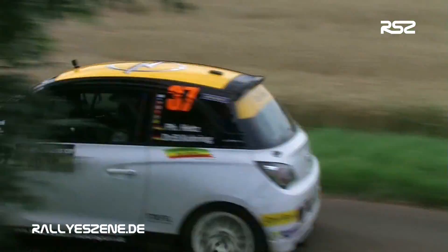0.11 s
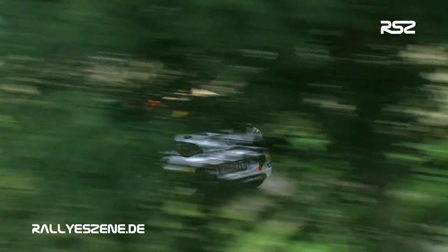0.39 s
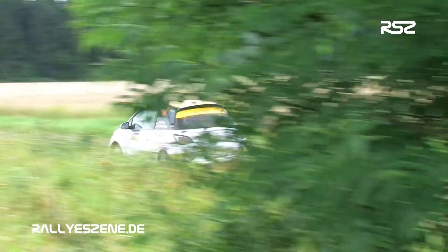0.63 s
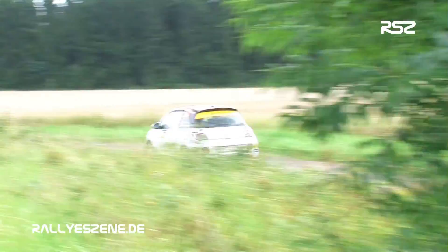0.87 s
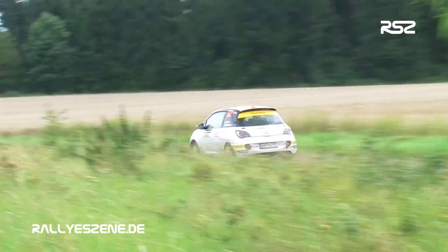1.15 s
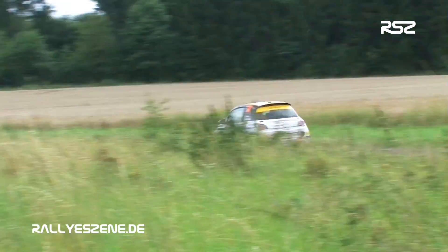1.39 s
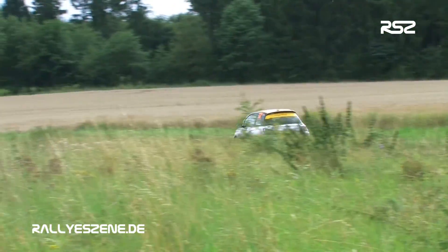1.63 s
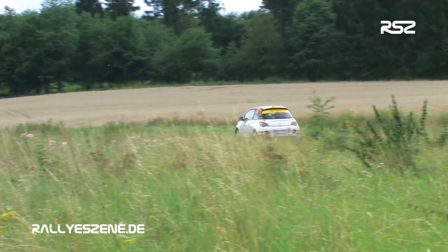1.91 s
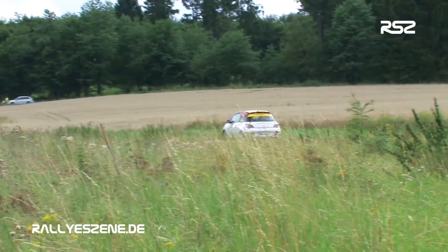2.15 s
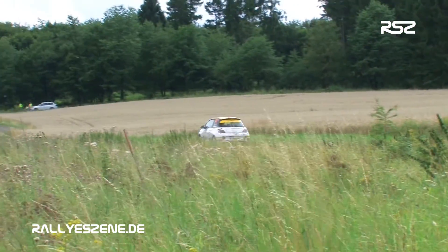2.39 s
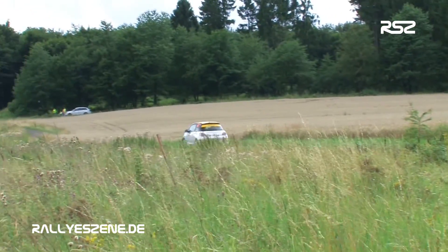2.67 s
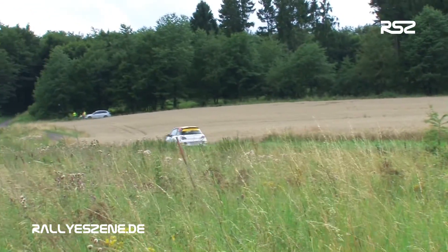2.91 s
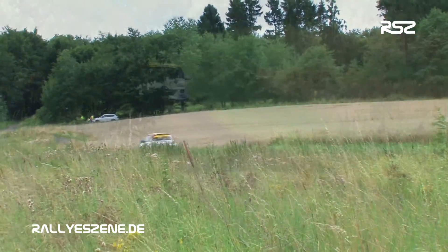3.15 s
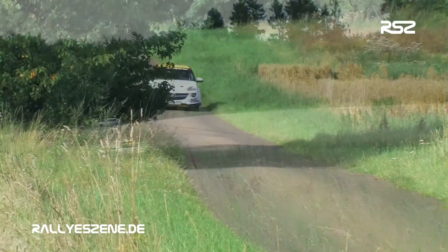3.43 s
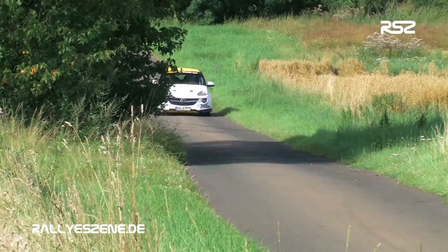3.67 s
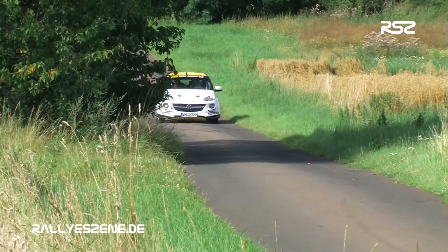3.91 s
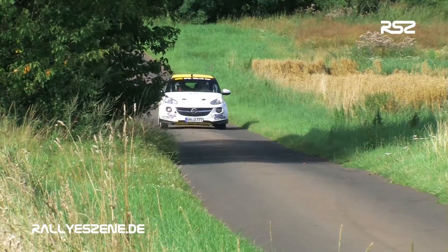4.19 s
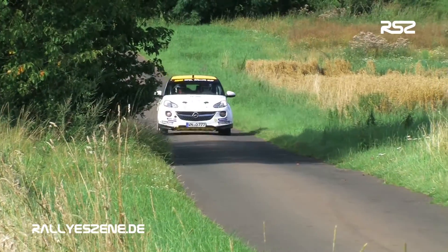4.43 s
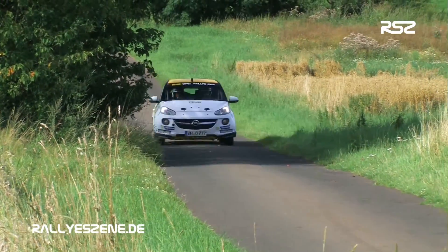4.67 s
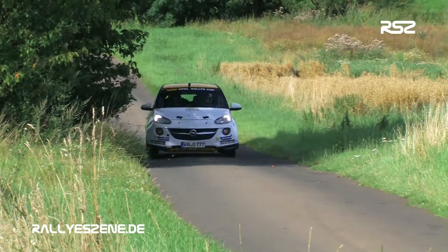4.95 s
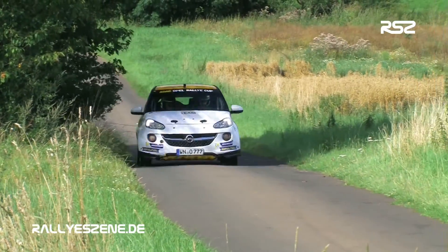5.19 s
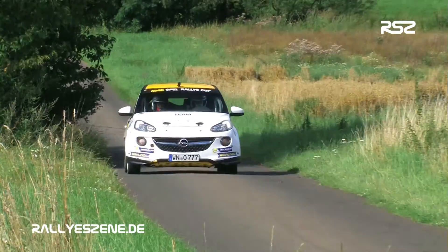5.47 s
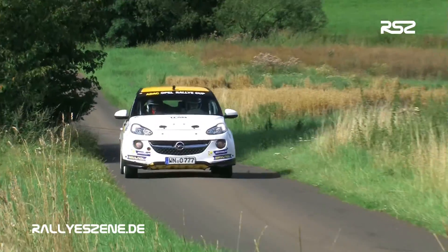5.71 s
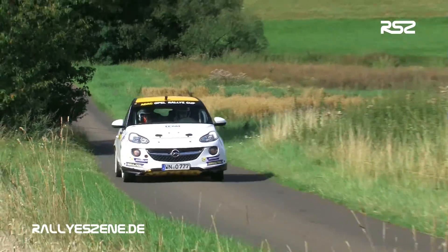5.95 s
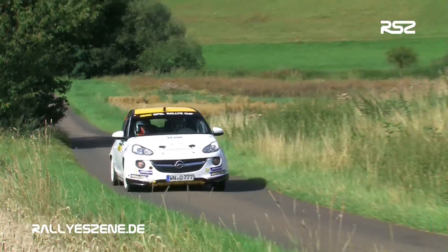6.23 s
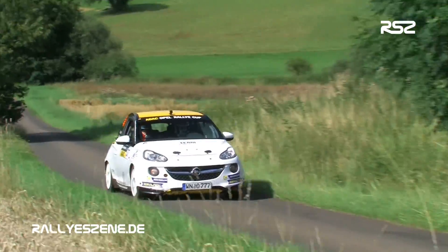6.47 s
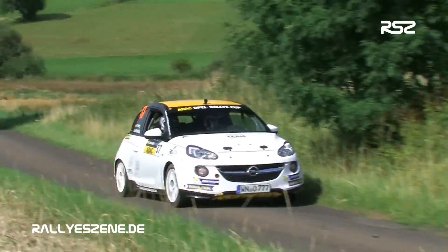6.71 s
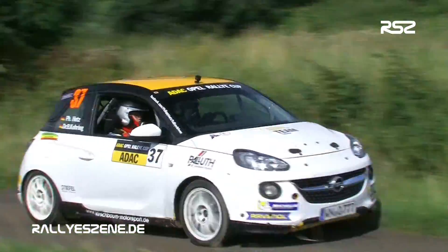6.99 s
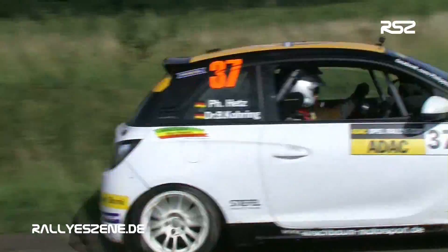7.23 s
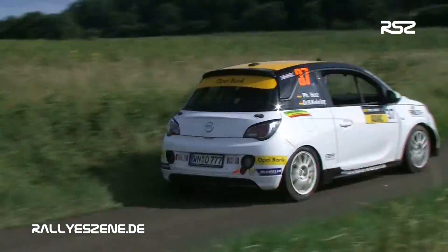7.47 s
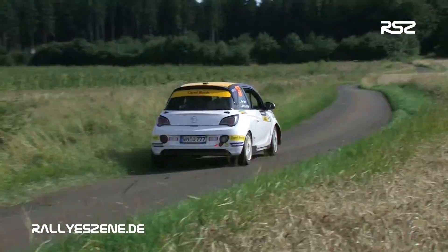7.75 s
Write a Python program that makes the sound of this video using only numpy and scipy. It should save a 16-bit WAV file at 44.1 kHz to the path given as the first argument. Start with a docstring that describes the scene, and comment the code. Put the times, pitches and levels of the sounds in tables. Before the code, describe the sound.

A small rally car has just passed close by and howls away over a field, its raspy exhaust holding high revs with quick gear-change dips and gritty cracks. The sound fades across to a similar car far down a country road, which swells with gear whine and tyre roar, bursts past and drops in pitch. Outdoors, near-mono close stereo microphones, with faint grasshopper and quiet air.

```python
"""A four-cylinder rally car howls away across a field at high revs; the sound then fades over to
the same kind of car coming head-on down a country road, sweeping past and dropping in pitch.
Crank orders are wavering sines bent by Doppler; tyre and intake roar is shaped noise, and a gear whine
sings at the tooth rates. Trees return the firing tone; short noise bursts crack and scuff.
Behind lie a low ground rumble, quiet air and a faint grasshopper, all heard on two close microphone ports."""
import sys
import numpy as np
from scipy import signal
from scipy.fft import rfft, irfft, next_fast_len
from scipy.io import wavfile
from scipy.ndimage import uniform_filter1d

SR = 44100
rng = np.random.default_rng(int(sys.argv[2]) if len(sys.argv) > 2 else 0)


def store_pcm(level_fs):
    """Save levels as 16-bit WAV."""
    pcm = np.round(np.clip(level_fs, -1, 1) * 32767).astype(np.int16)
    wavfile.write(sys.argv[1], SR, np.atleast_2d(pcm).T)


def voltage_ratio(level):
    """Linear amplitude factor for a level in decibels (scalar or array-like)."""
    return 10 ** (np.asarray(level, float) / 20)


N = 346626
T = np.arange(N) / SR  # time of every sample [s]

SPEED_M_S, PASS_M, SOUND_M_S = 32, 6.4, 343  # road speed, closest distance to the microphone, speed of sound
TYRE_LEAD_S, GEARBOX_LEAD_S = 0.24, 0.047  # tyres with intake, and gearbox, pass this long before the tailpipe
# each car: (tailpipe abreast [s], firing tone cancels [s], strength of the pipe's upper orders [dB])
FIRST, SECOND = (.1, -0.062, 1.5), (7.37, 7.04, -1.5)
FACING_S, FACING_FOR_S = 6.04, 0.42  # the grille points straight at the microphone


def evened(x):
    """Scales to rms 1."""
    return x / np.sqrt(np.mean(x ** 2) + 1e-20)


def read(points, hz):
    """Value of a spectrum table on a log-frequency axis."""
    f, value = np.transpose(points)
    return np.interp(np.log(hz + 1), np.log(f + 1), value)


def columns(rows, t):
    """Every column of a curve table at the times t."""
    s, *rest = np.transpose(rows)
    return [np.interp(t, s, c) for c in rest]


def rfftfreq_hz(size):
    """Bin frequencies of a real transform."""
    return np.fft.rfftfreq(size, 1 / SR)


def drift(hz):
    """Smooth random wander of rms 1, changing about hz times a second."""
    size = max(round(SR / hz / 2), 1)
    once = uniform_filter1d(rng.standard_normal(N), size)
    return evened(uniform_filter1d(once, size))


def band(x, hz, width):
    """Band-pass around hz."""
    edges = np.clip([hz - width / 2, hz + width / 2], 20, .49 * SR)
    return signal.sosfilt(signal.butter(2, edges, "band", fs=SR, output="sos"), x)


def bump(t, s, length):
    """Bell of height 1."""
    return np.exp(-((t - s) / length) ** 2)


def faded_over(t):
    """0 while the car in the field is heard, 1 for the car on the road."""
    return np.interp(t, (3.054, 3.71), [0, 1])


def tail_shown(t):
    """Share of the tailpipe side in what is heard: the first car, then the second's nose, then its tail."""
    return np.where(faded_over(t) < .5, 1, .5 + .5 * np.tanh((t - 7.2) / .1))


def second_tail(t):
    """Tailpipe share of the second car alone, all nose until it is nearly abreast."""
    return np.where(t < 6.2, 0, tail_shown(t))


def along(t, abreast_s):
    """Metres past the closest point, and distance from the microphone."""
    past = SPEED_M_S * (t - abreast_s)
    return past, np.hypot(past, PASS_M)


# the climb up the winding road toward the microphone:
# (time [s], nearness [dB], firing tone [dB], its octave [dB])
APPROACH = [(3.6, -33.5, -50, -59.5), (4.13, -31.5, -44.5, -64), (4.9, -26.5, -39, -59),
            (5.5, -24.5, -31, -57), (5.9, -17, -31.5, -47), (6.15, -10.5, -25.5, -46),
            (6.45, -8, -17.5, -42), (6.75, -7, -17, -26.5), (7.0, -1, -15.5, -28), (7.2, 3.5, -12, -23)]
# how each layer follows nearness, before its own trims; treble and rumble are against the roar:
# (tail side when closest [dB], share, nose side when closest [dB], share, gain when facing [dB])
FOLLOW = dict(rasp=(-23.5, 1.03, -33, .75, .1), roar=(-27, .65, -18.5, 1.01, .1),
          treble=(-7, .1, -5, .1, 7), rumble=(0, .55, -8, -.2, -2), whine=(-61, .5, -36, 1.35, 14))


def levels(t, car, tail):
    """Every layer's dB: spreading with distance from the tail side, the approach from the nose side."""
    abreast_s, cancel_s, upper_db = car
    nose = 1 - tail
    away_db, ahead_db = [20 * np.log10(PASS_M / along(t + lead, abreast_s)[1]) for lead in (0, TYRE_LEAD_S)]
    near_db, firing_db, octave_db = columns(APPROACH, t)
    facing = bump(t, FACING_S, FACING_FOR_S)
    out = {}
    for name, (tail_db, share, nose_db, nose_share, facing_db) in FOLLOW.items():
        tail_side = tail_db + share * (ahead_db if name == "roar" else away_db)
        if name == "rasp":
            tail_side = tail_side + upper_db
        nose_side = nose_db + nose_share * near_db + facing_db * facing
        out[name] = tail * tail_side + nose * nose_side
    # tyres hiss brighter while the flank is in view
    for name, db in (("roar", 4.5), ("treble", 3)):
        out[name] = out[name] + tail * db * bump(t, abreast_s - TYRE_LEAD_S, 0.45)
    # nose and tailpipe meet in opposite phase for a moment
    cancel_db = -12.5 * bump(t, cancel_s, 0.065)
    out["firing"] = tail * (-12 + 0.36 * away_db) + nose * firing_db + cancel_db
    out["octave"] = tail * (-17.5 + 1.15 * away_db + upper_db) + nose * octave_db + 0.73 * cancel_db
    out["thump"] = tail * (-32.5 + 0.37 * away_db) + nose * (-18 + 0.52 * firing_db)
    return out


def meadow():
    """A grasshopper's rasp, each beat dying away at once, over quiet air that differs at the two ports."""
    beat = T * 19.3 % 1  # beats per second
    rasp = evened(band(rng.standard_normal(N), 7100, 1100)) * np.exp(-beat / .12)
    air = evened(band(rng.standard_normal((2, N)), 10000, 6000))
    return voltage_ratio(-63) * rasp + voltage_ratio(-80) * air


def ground_rumble():
    """Low lumpy rumble, band-passed noise: weak in the field, growing as the second car nears."""
    over = faded_over(T)
    level_db = -46 - 12.5 * (1 - over) + 0.22 * over * columns(APPROACH, T)[0]
    low_noise = evened(band(rng.standard_normal(N), 65, 45))
    return voltage_ratio(level_db + 4.0 * drift(5)) * low_noise


# firing tone thrown back by trees behind the nearing car, lowered by its motion:
# (time [s], pitch [Hz], level [dB])
ECHO = [(5.36, 198, -34), (5.64, 198, -30), (5.82, 190.1, -33), (6.9, 196, -32)]


def echo():
    """A fuzzy gliding tone with a weak octave, from many trunks at once."""
    hz, db = columns(ECHO, T)
    angle = 2 * np.pi * np.cumsum(hz + 3.06 * drift(6.9)) / SR
    heard = np.clip(np.minimum(T - ECHO[0][0], ECHO[-1][0] - T) / 0.06, 0, 1)
    tones = np.cos(angle) + voltage_ratio(-20) * np.cos(2 * angle)
    return np.sqrt(2) * heard * voltage_ratio(db + 2.5 * drift(20)) * tones


# exhaust cracks, tyre scuffs, gravel spits and two brief drones near 1 kHz:
# (time [s], level before halving [dB], length [s], centre [Hz], width [Hz])
CRACKS = [(0.394, -47, 0.0095, 8960, 6900), (.05, -15, 0.072, 930, 400), (0, -33, .12, 5500, 4000),
          (0.961, -28.5, 0.24, 1180, 300), (0.966, -29.5, 0.031, 3880, 700), (1.102, -27, 0.02, 3800, 1200),
          (1.129, -31.5, 0.082, 3820, 1300), (1.557, -31, 0.046, 1150, 350), (1.562, -29, 0.05, 2100, 495),
          (1.682, -36, 0.05, 3800, 1800), (1.75, -34.5, 0.054, 3830, 1480), (3.847, -50, .003, 8850, 6000),
          (3.98, -46, .25, 1050, 130), (4.7, -45, .12, 1030, 80), (4.615, -46, .003, 9600, 3000),
          (7.646, -27, 0.011, 3020, 2500), (7.696, -26.5, 0.029, 7760, 3470),
          (7.702, -18.5, 0.031, 3840, 1500), (7.695, -16, 0.025, 1850, 1620)]


def cracks():
    """Short gritty bursts with a fast start: spiky noise, band-passed twice, under a falling bell."""
    out = np.zeros(N)
    for s, db, length, hz, width in CRACKS:
        u = np.arange(round(3 * length * SR)) / (length * SR)
        grit = rng.standard_normal(len(u)) ** 2 * rng.standard_normal(len(u))
        noise = band(band(grit, hz, width), hz, 2 * width)
        burst = evened(noise) * np.minimum(u / 0.13, 1) * np.exp(-u ** 2)
        part = out[round(s * SR):][:len(u)]
        part += voltage_ratio(db) / 2 * burst[:len(part)]
    return out


# relative spectrum of tyre and intake roar: (frequency [Hz], level per Hz [dB])
ROAR_COLOUR = [(90, -3), (190, 6), (620, -2), (950, 2), (1350, -2), (2100, 0), (2950, -9), (4000, -4.5),
               (5700, -22), (6900, -16), (8100, -23), (9000, -20), (11400, -34), (12100, -47), (12700, -36),
               (14000, -36.5)]
# likeness of the roar at the two ports: (frequency [Hz], left-right likeness [0..1])
LIKENESS = [(300, .99), (3000, .98), (7000, .998), (13000, .93)]
# intake colouring heard from the nose, two dips and one peak: (centre [Hz], width [Hz], level change [dB])
INTAKE = [(1070, 36, -3), (1300, 950, -4), (1634, 260, 5)]
# rougher stretches under the tyres: (time [s], length [s], level [dB])
SURGES = [(0.047, 0.044, 3), (1.605, 0.062, 5), (3.1, 0.072, 4)]


def roar(turns):
    """Tyre and intake roar: patchy noise, two nearly alike channels, puffing a little with each firing."""
    frames, hz = N // 128 + 5, rfftfreq_hz(512)
    t = np.arange(frames) * 128 / SR
    over = faded_over(t)
    first = levels(t, FIRST, 0.98)
    second = levels(t, SECOND, second_tail(t))
    first_gain = (1 - over) ** 1.05 * voltage_ratio(first["roar"])
    second_gain = np.sqrt(over) * voltage_ratio(second["roar"])
    level_db = 20 * np.log10(np.hypot(first_gain, second_gain))
    treble_db, rumble_db = [(1 - over) * first[name] + over * second[name] for name in ("treble", "rumble")]
    surge_db = sum(db * bump(t, s, length) for s, length, db in SURGES)

    a, b, c, d, patches = rng.standard_normal((frames, len(hz), 5)).T
    patches = evened(uniform_filter1d(uniform_filter1d(patches, size=8, axis=0), size=18, axis=1))
    gusts = evened(uniform_filter1d(rng.standard_normal(frames), size=14))
    colour = voltage_ratio(read(ROAR_COLOUR, hz))
    colour /= np.sqrt(np.mean(colour ** 2 * (hz > 1100) * (hz < 3000)))
    # distance eats more of the top octaves
    high = np.interp(np.log(hz + 1), np.log([2500, 4000, 11000]), [0, 1, 1.45])[:, None]
    low = np.interp(np.log(hz + 1), np.log([350, 900]), [1, 0])[:, None]
    intake_db = sum(db / (1 + (2 * (hz - f) / width) ** 2) for f, width, db in INTAKE)[:, None]
    intake_db = intake_db * (1 - tail_shown(t))

    same, left = read(LIKENESS, hz)[:, None], a + 1j * b
    right = same * left + np.sqrt(1 - same ** 2) * (c + 1j * d)
    z = np.array([left, right]) / signal.istft(left, nperseg=512, noverlap=384)[1].std()
    shape_db = level_db + high * (treble_db + 3.5) + low * (rumble_db - 0.5) + intake_db
    rough_db = 0.91 * patches + (0.42 * gusts + surge_db) * (hz[:, None] > 900)
    z *= colour[:, None] * voltage_ratio(shape_db + rough_db)
    puffs = 1 + .22 * np.cos(4 * np.pi * turns) + .13 * np.cos(2 * np.pi * turns)
    return signal.istft(z, nperseg=512, noverlap=384)[1][:, :N] * puffs


def tone(order, turns, db):
    """A sine at a multiple of the shaft's turning, from a random phase."""
    return np.sqrt(2) * voltage_ratio(db) * np.cos(2 * np.pi * (order * turns + rng.random()))


def locked(order, turns, db, lag=0):
    """A crank order in sine phase, less its lag in turns: unlagged pulses rise fast and fall slowly."""
    return np.sqrt(2) * voltage_ratio(db) * np.sin(2 * np.pi * (order * turns - lag))


# the gearbox side turns toward the listener: (time [s], length [s], level [dB])
WHINE_SWELLS = [(.04, .17, 13), (2.45, .2, 5)]


def whine(nose_turns, car, tail, close, wavers):
    """Gear whine: two sines at 40 and 60 teeth per crank turn, from the gearbox in the nose."""
    turns = nose_turns + np.cumsum(.13 * drift(14)) / SR  # 0.13 Hz of wobble
    db = levels(T, car, tail ** 4)["whine"] + 1.5 * drift(4) - 9 * np.sqrt(tail) * (1 - tail)
    db = db + sum(swell_db * bump(T, s, length) for s, length, swell_db in WHINE_SWELLS)
    lower = tone(40, turns, db + 3 - 6 * tail - 13 * close + 2.5 * wavers[5])
    return lower + tone(60, turns, db + 3.5 * wavers[3])


# gear changes: (time [s], drop of revs [Hz], recovery [s])
SHIFTS = [(0.478, 5, 0.04054), (1.579, 4.3, .3), (7.68, 4.7, 0.064)]


def crank_turns(revs, abreast_s, tail):
    """Crank angle in turns as heard from tailpipe and gearbox: revs with shift dips, bent by Doppler."""
    hz = columns(revs, T)[0]
    fall_s = 0.0406
    for s, drop_hz, back_s in SHIFTS:
        fall = np.clip((T - s) / fall_s, 0, 1)
        hz = hz - drop_hz * fall * np.exp(-np.maximum(T - s - fall_s, 0) / back_s)
    hz = hz * (1 + (0.00073 + 0.00069 * tail) * drift(30.2))
    heard = []
    for lead in (0, GEARBOX_LEAD_S):
        past, distance = along(T + lead, abreast_s)
        heard.append(np.cumsum(hz * (1 - past / distance * SPEED_M_S / SOUND_M_S)) / SR)
    return heard


# weaker crank orders against the rasp: (order [per crank turn], level from the tailpipe side [dB],
# level from the nose [dB], gain of the nose close up [dB])
ORDERS = [(1.5, -14.5, 3, -2), (2.5, -16, -4.5, 4), (3, -6, 0, -1.5), (5, -4.5, -20.5, 17),
          (6, -3.5, 2.5, 0), (6.5, -24.5, -12.5, -1), (7, -14, -10.5, 0), (8, -5.5, -9, 5),
          (9, -3, -4.5, 9.5), (10, -5.5, -10, 14.5), (11, -14, -12.5, 9), (12, -18.5, -16, 14.5),
          (15, -20.5, -4, 9.5), (16, -24, -6, 11), (20, -28, -13, 10)]


def engine(revs, car, tail):
    """Crank orders as wavering sines, with gear whine; returns the sound and the crank angle in turns."""
    turns, nose_turns = crank_turns(revs, car[0], tail)
    level = levels(T, car, tail)
    nose = 1 - tail
    wavers = [drift(26) for _ in range(7)]  # the air and uneven burning make the orders flutter
    firing_flutter_db = 0.61 + 1.8 * nose * (T < FACING_S)
    out = tone(1, turns, level["thump"] + (1.0 + 1.6 * nose) * wavers[0])
    out += locked(2, turns, level["firing"] + firing_flutter_db * wavers[1])
    out += locked(4, turns, level["octave"] + wavers[1])
    close = np.clip(1 + columns(APPROACH, T)[0] / 22, 0, 1)
    for k, (order, tail_db, nose_db, close_db) in enumerate(ORDERS):
        db = level["rasp"] + tail * tail_db + nose * (nose_db + close * close_db)
        flutter_db = np.where(order > 6, 1.7, .6 + .6 * tail)
        # phase lag grows with the order's square, odd orders are offset further, with a random slip [turns]
        lag = .0235 * order ** 2 + .15 * (order % 2) + .045 * np.sqrt(order / 10) * wavers[(k + 3) % 7]
        out += locked(order, turns, db + flutter_db * wavers[k % 7], lag)
    return out + whine(nose_turns, car, tail, close, wavers), turns


# crank speed on board, leaving across the field and coming down the road: (time [s], turns [Hz])
REVS_LEAVING = [(0, 100.9), (.2, 102.1), (.36, 100.2), (.47, 103.4), (.7, 100.5), (1.05, 100.9),
                (1.3, 100.5), (1.55, 102.6), (2.2, 100.7), (2.45, 99.9), (3.13, 100.3)]
REVS_COMING = [(3.35, 102.9), (3.7, 101.9), (5.4, 104.5), (6.1, 104.7), (6.45, 105.9), (6.94, 104.4),
               (7.04, 102.8), (7.24, 104.5), (7.66, 104.7), (7.86, 107.7)]
# left-right lean of both cars, steady at first, then moving as the second sweeps past:
# (time [s], left minus right [dB])
LEAN = [(7.05, 3), (7.4, 2.5), (7.6, 0.5), (7.86, 4)]


def scene():
    """Both passes, their noise, and the meadow and ground rumble around the microphone."""
    over = faded_over(T)
    first, first_turns = engine(REVS_LEAVING, FIRST, np.ones(N))
    second, second_turns = engine(REVS_COMING, SECOND, second_tail(T))
    turns = np.where(over < .5, first_turns, second_turns)
    cars = (1 - over) * first + np.sqrt(over) * second + echo() + cracks() + roar(turns)
    lean_db = columns(LEAN, T)[0] * np.array([[.5], [-.5]])
    return cars * voltage_ratio(lean_db) + meadow() + ground_rumble()


# unequal colour of the two microphone ports: (frequency [Hz], left minus right [dB])
BALANCE = [(100, -0.5), (220, -1), (400, -2), (2400, -2.5), (4000, -2), (7000, -1)]


def ports(dry):
    """Two close microphone ports of unequal colour, with a low cut."""
    size = next_fast_len(N)
    hz = rfftfreq_hz(size)
    # radians: the left port leads and the right lags by this much in the low mids
    lead = 0.14 * np.exp(-np.log((hz + 1) / 520) ** 2)
    port = voltage_ratio(read(BALANCE, hz) / 2) * np.exp(1j * lead)
    low_cut = 1 / (1 + (45 / (hz + 1)) ** 4)
    return irfft(rfft(dry, size) * low_cut * np.array([port, 1 / port]), size)[:, :N]


def low_pass(x):
    """Removes everything above the highest recorded frequency."""
    return signal.sosfilt(signal.butter(12, 15430, fs=SR, output="sos"), x)


def record(dry):
    """The scene through the two microphone ports, under a hard ceiling."""
    mix = np.clip(ports(dry), -1, 1)
    return low_pass(mix)


dry = scene()
out = record(dry)
store_pcm(out)
```